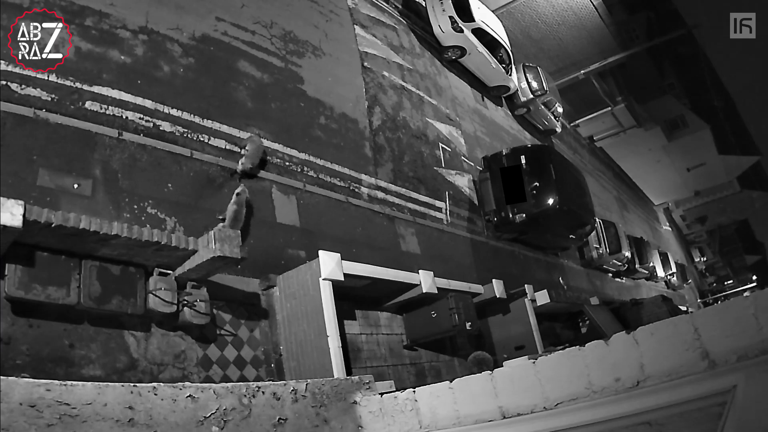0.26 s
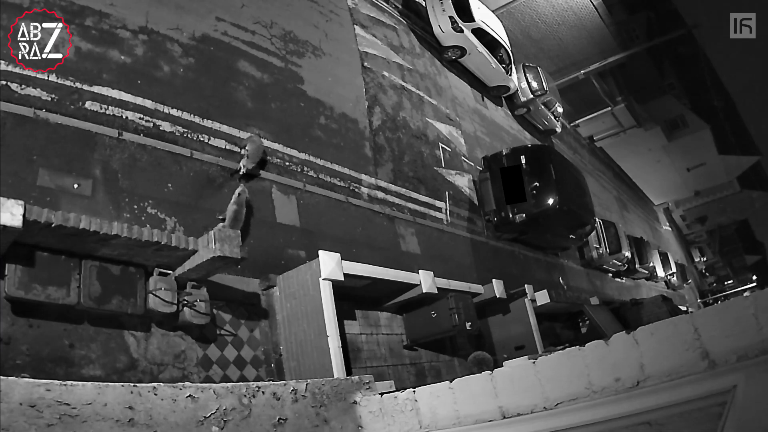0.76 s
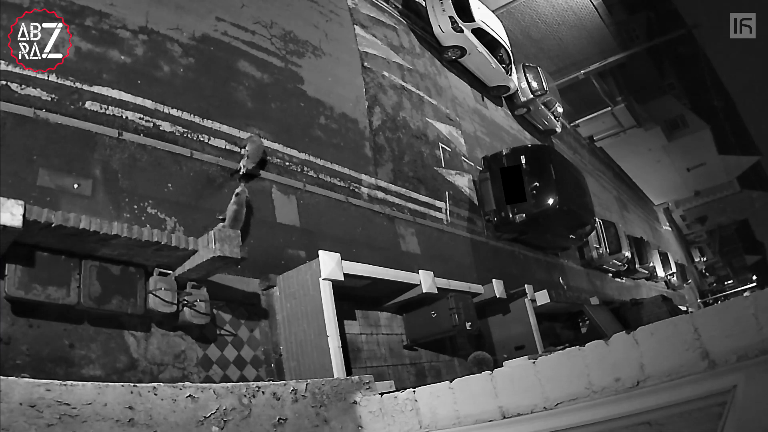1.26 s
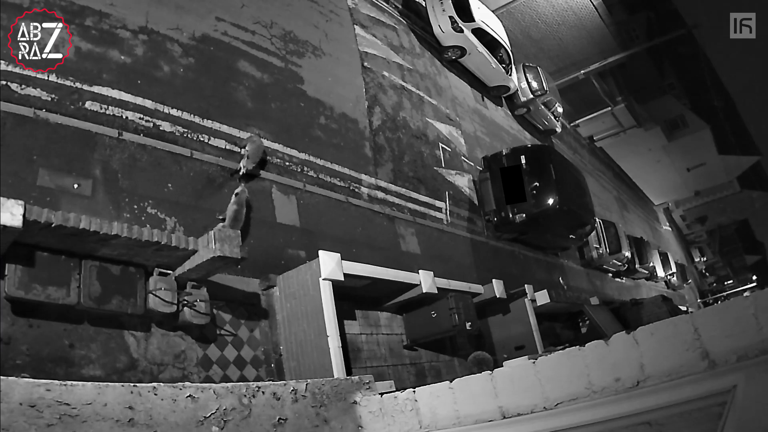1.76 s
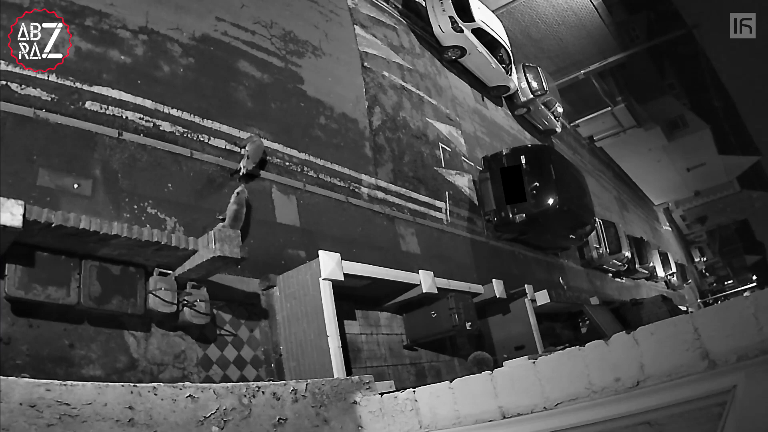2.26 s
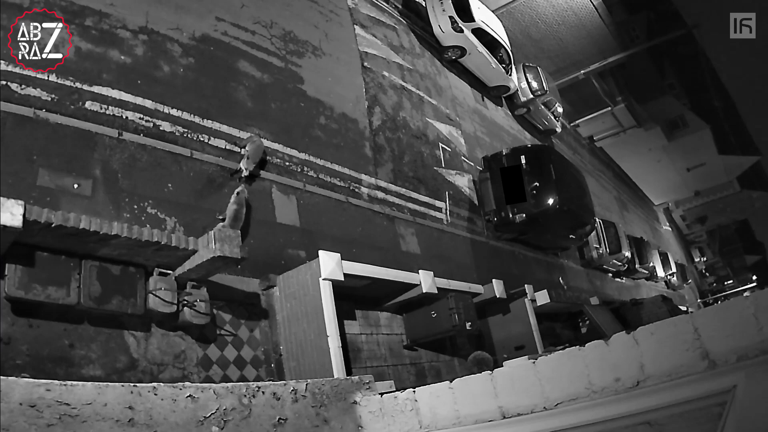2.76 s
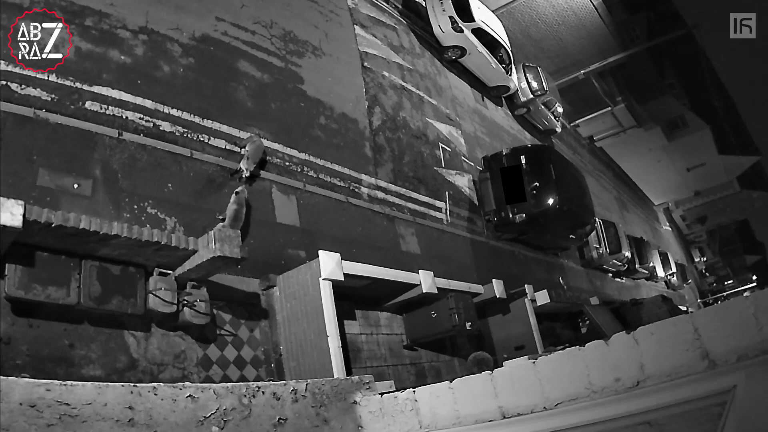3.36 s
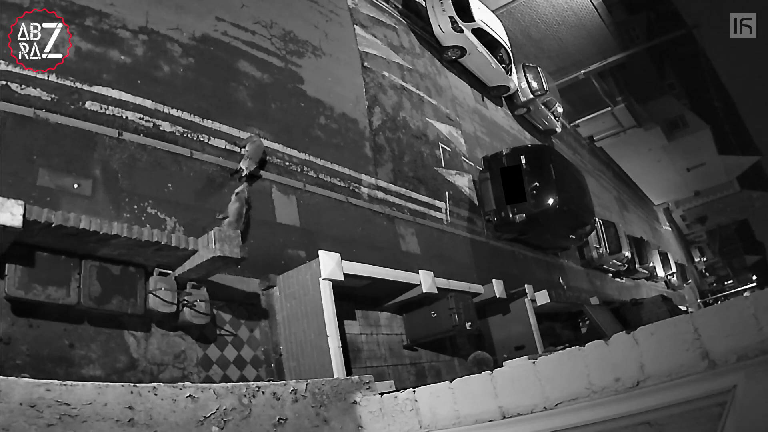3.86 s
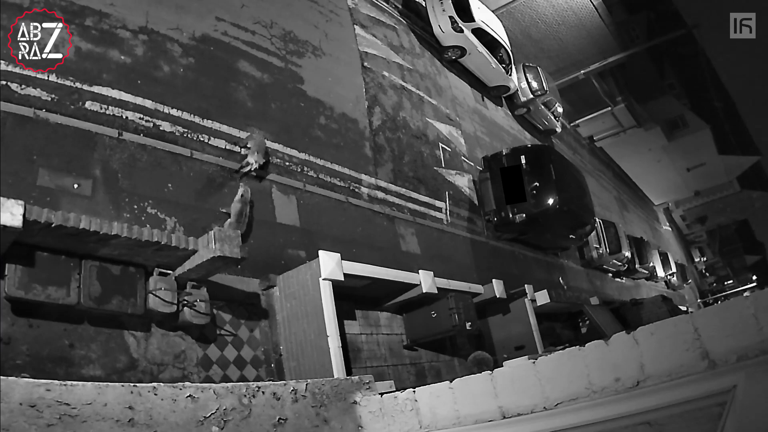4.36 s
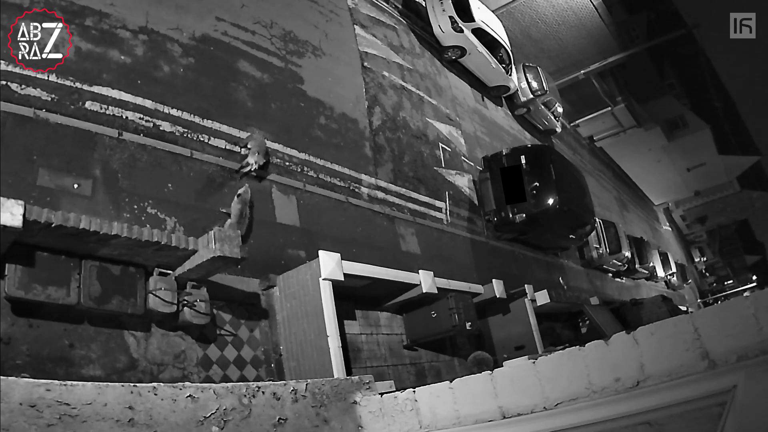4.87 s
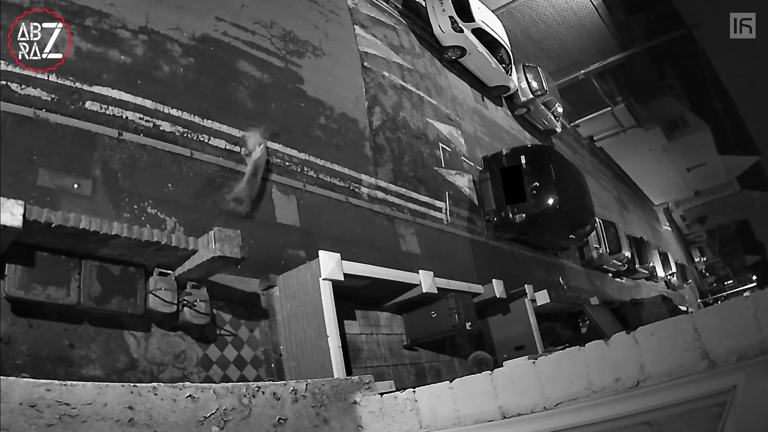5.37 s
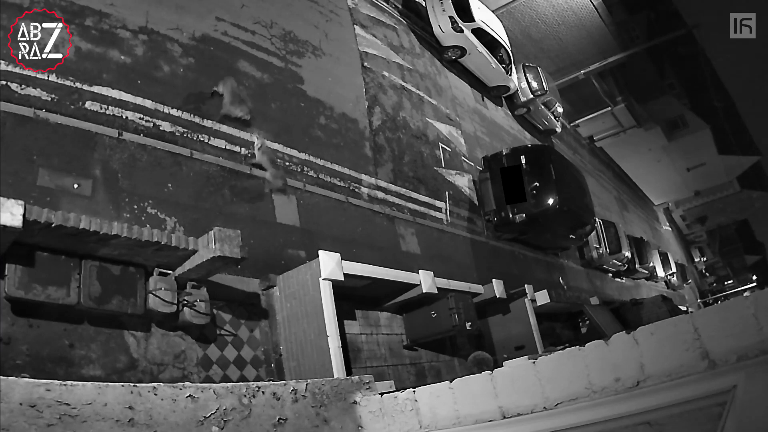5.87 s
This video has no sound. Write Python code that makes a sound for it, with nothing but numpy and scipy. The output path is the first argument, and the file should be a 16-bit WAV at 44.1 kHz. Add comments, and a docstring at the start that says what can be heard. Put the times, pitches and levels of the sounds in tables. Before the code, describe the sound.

Two foxes quarrel in a quiet street at night. From the start, one gives short, high, arching squeals and whines, chopped by a fast throat flutter and ranging from clean to raspy, with loud ones at about 0.5 and 1.6 seconds. The other answers with brief hoarse screeches, each opening on a tiny rising yip and falling at the end. Its longest screech runs from about 1.5 to 2 seconds, and another drawn-out one comes near 3.4 seconds. The two keep trading and overlapping calls roughly every half second. From about 5 seconds the chatter gets denser and harsher, and the second fox switches to three short snarls at about 5.6, 5.8 and 6.1 seconds, alternating with loud squeals. Every cry echoes briefly off the house fronts. A small microphone adds faint steady hiss and low hum, with a slight overload crackle on the loudest cries.

```python
"""Night street, below a house front: two foxes quarrel over food.
One chatters: whines and arching squeals chopped by a fast throat flutter, from clean to harsh.
The other answers with hoarse screeches, then snarls: chaotic fold pulses and air, with ringing peaks.
House fronts echo over faint hiss; a small microphone hums, colours the cries and overloads."""
import sys
import numpy as np
from scipy import signal
from scipy.fft import rfft, irfft
from scipy.io import wavfile
from scipy.ndimage import map_coordinates

SR = 44100
rng = np.random.default_rng(int(sys.argv[2]) if len(sys.argv) > 2 else 0)


def wrap_up_sound(samples):
    """Save the sound to the file named by the first command line argument, as 16-bit audio."""
    columns = np.atleast_2d(samples).T
    # keep every value between -1 and 1, then stretch to whole-number steps
    tamed = np.clip(columns, -1, 1)
    steps = np.round(tamed * 32767).astype(np.int16)
    wavfile.write(sys.argv[1], SR, steps)


N = 269892
T = np.arange(N) / SR
TOP_HZ = 15900
# hoarse calls: start_s, length_s, pitch_hz, last_pitch_hz, level_db
SCREECH_CALLS = [ (0.315, 0.11, 1010, 771, -27), (0.787, 0.11, 998, 752, -30.5),
                 (1.462, .535, 991.2, 757, -25.5), (2.322, 0.18, 997, 899.5, -25.5),
                 (2.502, 0.074, 853, 713.6, -43.5), (2.878, 0.12, 1008, 793, -25.5),
                 (3.358, 0.32, 980, 756, -28.5), (3.953, .115, 1018, 798.7, -27.5),
                 (4.297, 0.12, 1038, 906, -27), (4.738, .1, 980, 930, -27.5), (5.077, 0.12, 1010, 929, -26)]


def undb(db):
    """Decibels to gain."""
    return 10 ** (np.asarray(db) / 20)


def unit(x):
    """Scale to rms 1."""
    return x / np.sqrt(np.mean(x ** 2))


def gain_at(hz, spectrum):
    """Spectrum gain, interpolated in log frequency."""
    points_hz, db = np.transpose(spectrum)
    return undb(np.interp(np.log(hz + 1), np.log(points_hz), db))


def colour(x, spectrum, resonances=()):
    """Filter by a broad spectrum plus resonant humps; rms 1."""
    f = np.arange(N // 2 + 1) * SR / N
    humps_db = sum(db / (1 + (2 * (f - hz) / width_hz) ** 2) for hz, width_hz, db in resonances)
    return unit(irfft(rfft(x) * gain_at(f, spectrum) * undb(humps_db), N))


def wander(hz):
    """Random motion, rms 1, rolled off above hz."""
    f = np.arange(N // 2 + 1) * SR / N
    return unit(irfft(rfft(rng.standard_normal(N)) * np.exp(-(f / hz) ** 2), N))


def perform(calls, edge_s):
    """Join calls into a gate and full-length control curves."""
    gate, curves = np.zeros(N), np.tile(calls[0][1:, :1], N)
    for time_s, *controls in sorted(calls, key=lambda call: call[0, 0]):
        span = slice(*np.searchsorted(T, [time_s[0] - edge_s, time_s[-1] + edge_s]))
        outside_s = np.maximum(time_s[0] - T[span], T[span] - time_s[-1])
        gate[span] = np.maximum(gate[span], np.clip(2 - 2 * outside_s / edge_s, 0, 1))
        curves[:, span] = [np.interp(T[span], time_s, control) for control in controls]
    return [gate, *curves]


def folds(hz, spectrum, count):
    """Vocal fold harmonics, one per row, total power 1; the throat scatters their phases."""
    phase = 2 * np.pi * np.cumsum(hz) / SR
    k = np.arange(1, count + 1)[:, None]
    size = gain_at(k * hz, spectrum) * (k * hz < TOP_HZ)
    lag = rng.uniform(0, 2 * np.pi, (count, 1))
    return np.sqrt(2) * np.sin(k * phase + lag) * size / np.sqrt(np.sum(size ** 2, axis=0))


def night(air_db=-72):
    """Faint air hiss and wavering microphone hum."""
    # hum lines: freq_hz, level_db
    hum_lines = [(150.7, -85), (253.0, -76.5), (452.2, -87), (554.5, -85.5)]
    # night air: freq_hz, gain_db
    air_spectrum = [(18, -96), (30, -22), (133, -41), (202, -15.5), (263, -31), (389, -5.5), (443, -14.5),
                    (808, -9.5), (1550, -7), (4190, -14), (15500, -26.5)]
    hum = sum(np.sqrt(2) * undb(db + wander(5)) * np.sin(2 * np.pi * hz * T) for hz, db in hum_lines)
    return hum + undb(air_db) * colour(rng.standard_normal(N), air_spectrum)


def whine(start_s, length_s, first_hz, last_hz, first_rate_hz, last_rate_hz, first_db, last_db, harsh):
    """Control curves of a glide that levels off."""
    share = np.linspace(0, 1, 20)
    glide = 1 - (1 - share) ** 2
    pitch_hz = first_hz + (last_hz - first_hz) * glide
    flutter_hz = first_rate_hz + (last_rate_hz - first_rate_hz) * glide
    level_db = first_db + (last_db - first_db) * share
    harshness = np.full_like(share, harsh)
    return np.array([start_s + length_s * share, pitch_hz, flutter_hz, level_db, harshness])


def squeal(start_s, length_s, top_hz, first_rate_hz, last_rate_hz, swell_s, db, harsh):
    """Control curves of one arch of effort: scoop to a crest, then pitch and level sink."""
    scoop, crest_share, end_hz = .07, .22, 840
    swell_db, fade_db = 10.5, 23.5
    break_hz, break_width_hz, break_db, break_harsh = 1194, 123, 3.5, .28
    age_s = np.linspace(0, length_s, 40)
    share = age_s / length_s
    rise = np.clip(1 - share / crest_share, 0, 1) ** 2
    sink = np.clip((share - crest_share) / (1 - crest_share), 0, 1) ** 2.1
    pitch_hz = top_hz * (1 - scoop * rise) + (end_hz - top_hz) * sink
    # flutter mostly slows as breath runs out
    flutter_hz = np.interp(age_s, [.0244, .0914], [first_rate_hz, last_rate_hz])
    # the voice breaks on the way down: a harsh catch, then a cleaner whimper
    catch = np.exp(-((pitch_hz - break_hz) / break_width_hz) ** 2) * (sink > 0)
    onset = np.clip(1 - age_s / swell_s, 0, 1)
    level_db = db - swell_db * onset - fade_db * sink ** 1.2 + break_db * catch
    harshness = harsh * np.interp(pitch_hz, [end_hz, break_hz], [.5, 1]) + break_harsh * catch
    return np.array([start_s + age_s, pitch_hz, flutter_hz, level_db, harshness])


def throat_puffs(calls, flutter_hz, width_cycles=.18, blur_hz=150):
    """Throat opening, 0-1; each call starts on a puff, and fast flutter merges the puffs."""
    cycles = np.zeros(N)
    for time_s, _, rate_hz, *_ in sorted(calls, key=lambda call: call[0, 0]):
        span = slice(*np.searchsorted(T, [time_s[0] - .5 / rate_hz[0], time_s[-1] + 1 / rate_hz[-1]]))
        cycles[span] = np.cumsum(np.interp(T[span], time_s, rate_hz)) / SR - .5
    in_cycle = (cycles + .5) % 1 - .5
    puff = np.exp(-.5 * np.abs(in_cycle / width_cycles) ** 3)
    merged = np.clip((flutter_hz / blur_hz) ** 6, 0, 1)
    return (1 - merged) * puff + merged / 2


def chatter(leak=.12, bend=.025, jitter=.03932, ragged_db=3, whistle_hz=12850, whistle_db=-13):
    """First fox: a high voice let out in puffs; force breaks it into rasp."""
    # arches: start_s, length_s, top_hz, first_flutter_hz, last_flutter_hz, swell_s, level_db, harshness
    squeals = [ (0.132, 0.11, 1745, 78, 49, 0.021, -29.5, 0.34),
               (0.509, 0.097, 2020, 72, 37.3, 0.015, -19.5, 0.6),
               (1.086, 0.12, 1421, 72.7, 52.1, 0.036, -35.5, 0.38),
               (1.312, 0.11, 1408, 77.6, 54.77, 0.034, -32, 0.54),
               (1.632, 0.13, 1734, 89.9, 72.7, 0.064, -20, 0.53),
               (2.128, 0.12, 1692, 107.5, 65.5, 0.013, -29.5, 0.32),
               (2.999, .12, 1865, 91.54, 53, 0.046, -22.5, 0.63),
               (3.692, .13, 1860, 86.8, 67, 0.055, -23.5, 0.45),
               (3.949, 0.12, 1950, 99.3, 61.5, .022, -27, 0.63),
               (4.293, .112, 2064, 71.04, 44.5, 0.027, -23, 0.81),
               (4.722, .13, 1700, 70.13, 62.68, .012, -28.5, 0.46),
               (4.963, 0.063, 1180, 148, 152, 0.025, -35, 0.4),
               (5.072, .08, 2020, 92.6, 87.2, 0.019, -33, 0.73),
               (5.296, 0.12, 1817, 87.4, 54.97, 0.024, -24.5, .52),
               (5.519, 0.12, 2150, 73.66, 71, 0.024, -18, 0.68),
               (5.747, .095, 2000, 95.5, 93.3, 0.034, -19.5, 0.76),
               (6.004, 0.096, 2100, 70.5, 45.3, .008, -26, 0.74)]
    # glides: start_s, length_s, first_hz, last_hz, first_flutter_hz, last_flutter_hz,
    # first_db, last_db, harshness
    whines = [ (0, 0.019, 1520, 1417, 69, 66, -49, -53, 0.47),
              (1.195, 0.044, 980, 890, 139.3, 141.8, -42, -53, 0.04),
              (1.252, .04, 930, 1130, 139.9, 138, -40, -62, 0.22),
              (1.443, 0.029, 1400, 1678, 147.2, 140.8, -47, -30.5, 0.17),
              (3.18, .166, 1080, 1630, 56.6, 80.3, -39.5, -25.5, 0.49),
              (4.864, .03, 795, 752, 56, 55.5, -45.5, -47, 0.57),
              (4.924, 0.032, 896, 1120, 150.2, 152.6, -50, -45, 0.55),
              (5.423, 0.072, 1180, 1430, 54, 66.53, -44, -36.5, 0.4)]
    # fold harmonics: freq_hz, gain_db
    tone_spectrum = [(700, 46), (1200, -4.5), (1650, -2), (2100, -11), (2700, -8.5), (3350, 2.5),
                     (4200, -2), (5100, -3), (6500, -20)]
    # rasp noise: freq_hz, gain_db
    rasp_spectrum = [(200, -28), (800, -18.5), (1600, -11), (2600, -12), (3400, -10), (4300, 0.5),
                     (5400, -2), (6300, -14.5), (7000, -12), (8000, -24), (9500, -13.5), (12000, -4.5),
                     (13500, -33), (16000, -18)]
    # ringing peaks of the rasp: freq_hz, width_hz, gain_db
    peaks = [(4524, 110, 3.5), (13150, 390, 21)]
    calls = [squeal(*row) for row in squeals] + [whine(*row) for row in whines]
    gate, hz, flutter_hz, db, harsh = perform(calls, edge_s=.0059)
    harsh = np.clip(harsh, .03, .97)
    puff = throat_puffs(calls, flutter_hz)
    # pitch rises with puff pressure
    hz = hz * (1 + bend * (puff - 1) + .012 * wander(60) + jitter * harsh * wander(855))
    partials = [partial * undb(ragged_db * wander(140)) for partial in folds(hz, tone_spectrum, count=5)]
    # the fundamental carries on between puffs; overtones nearly stop
    tone = partials[0] * (.44 + .17 * puff) + sum(partials[1:]) * (leak + puff)
    whistle = np.sin(2 * np.pi * np.cumsum(whistle_hz * (1 + .016 * wander(120))) / SR)
    high_pitched = np.interp(hz, [1450, 1650], [0, 1])
    tone += undb(whistle_db) * whistle * puff * high_pitched
    rasp = colour(rng.standard_normal(N), rasp_spectrum, peaks) * (leak + puff)
    voice = ((1 - harsh) * tone + harsh * rasp) / np.hypot(1 - harsh, harsh)
    return 1.477 * voice * gate * undb(db + wander(68))


def yips(start_hz=1400, top_hz=1720, lead_s=.004, length_s=.034, gain_db=-12, scoop_db=15):
    """A short rising whistle opens each screech, before the folds turn chaotic."""
    offsets_s = length_s * np.array([0, .5, 1]) - lead_s
    calls = [np.array([start_s + offsets_s, [start_hz, top_hz, top_hz], [db - scoop_db, db, db]])
             for start_s, *_, db in SCREECH_CALLS]
    gate, hz, db = perform(calls, edge_s=.01)
    partials = folds(hz * (1 + .012 * wander(500)), [(1600, -1.5), (3300, -12.5), (4900, -5)], count=3)
    return partials.sum(axis=0) * gate * undb(gain_db + db)


def cry(start_s, length_s, hz, last_hz, db):
    """Control curves of a screech or snarl: pitch and level sag between surges."""
    attack_s, attack_db, release_s, release_db = .026, 10, .045, 9
    first_surge_s, surge_period_s, lull_db, lull_sag = .05, .21, 5.5, .07
    age_s = np.linspace(0, length_s, 80)
    attack = np.clip(1 - age_s / attack_s, 0, 1)
    release = np.clip(1 - (length_s - age_s) / release_s, 0, 1)
    lull = np.sin(np.pi * (age_s - first_surge_s) / surge_period_s) ** 2
    held_hz = hz * (1 - lull_sag * lull * (age_s > first_surge_s))
    pitch_hz = held_hz + (last_hz - held_hz) * release ** 2
    level_db = db - attack_db * attack - lull_db * lull - release_db * release
    return np.array([start_s + age_s, pitch_hz, level_db])


def hoarse_voice(calls, peaks, jitter, air_db, tone_db, settle_s, rough_db=3, tone_delay_s=.035):
    """Second fox: chaotic fold pulses and air with ringing peaks, over a thin wavering fundamental."""
    # hoarse timbre: freq_hz, gain_db
    spectrum = [(100, -29), (700, -28.5), (1250, -18), (2300, -12), (3000, -6.5), (3600, -14.5),
                (4600, -6.5), (5700, -11.5), (6900, -19), (8000, -28.5), (9500, -20), (11500, -20),
                (13000, -19), (16000, -26.5)]
    gate, hz, db = perform([cry(*row) for row in calls], edge_s=.014)
    # chaos settles into a buzz as the call is held
    age_s = T - np.maximum.accumulate(np.where(gate > 0, 0, T))
    chaos = np.exp(-age_s / settle_s)
    # fold motion repeats every third cycle: subharmonics
    pulse_hz = hz / 3 * (1 + jitter * chaos * wander(400))
    pulses = folds(pulse_hz, [(500, -32.5), (1000, -8), (2000, -22)], count=40).sum(axis=0)
    air = undb(air_db) * np.sqrt(chaos) * rng.standard_normal(N)
    rasp = colour((pulses + air) * undb(rough_db * chaos * wander(240)), spectrum, peaks)
    # all peaks tremble together in frequency
    warp = np.cumsum(1 + .007 * wander(14))
    rasp = map_coordinates(rasp, [warp], order=5, mode="mirror")
    tone_phase = 2 * np.pi * np.cumsum(hz * (1 + .028 * wander(150))) / SR
    tone = np.sin(tone_phase) * undb(4 * wander(45))
    # the fundamental enters late, after the rasp has begun, and stops with it
    late_gate = np.interp(T - tone_delay_s, T, gate)
    return gate * (rasp * undb(db) + late_gate * tone * undb(tone_db + .63 * db))


def screeches():
    """Hoarse cries with strong fold jitter, falling at the end."""
    # ringing peaks, voice and microphone colour together: freq_hz, width_hz, gain_db
    peaks = [(1564, 200, 10.5), (4170, 273, 14), (4955, 430, 7), (11080, 470, 10.5), (11930, 2100, 7.5)]
    return hoarse_voice(SCREECH_CALLS, peaks, jitter=.07, air_db=5.5, tone_db=-25, settle_s=.3956)


def snarls():
    """Three short hoarse cries: steadier folds, weaker fundamental."""
    # snarls: start_s, length_s, pitch_hz, last_pitch_hz, level_db
    calls = [ (5.58, .082, 1020, 900, -24), (5.805, .105, 1048, 999, -24), (6.075, 0.11, 1127, 1130, -20.5)]
    # ringing peaks, voice and microphone colour together: freq_hz, width_hz, gain_db
    peaks = [(1586, 232, 12.9), (2768, 140, 10.3), (3186, 147, 10.8), (4042, 290, 8.6), (4290, 180, 12.4),
             (11800, 990, 14)]
    return hoarse_voice(calls, peaks, jitter=.025, air_db=6, tone_db=-36, settle_s=.34)


def street(x, build_s=.0021):
    """Direct sound, distinct echoes and a diffuse tail decaying per band."""
    # echoes off kerb, walls and cars: delay_s, gain_db, cutoff_hz
    echoes = [(.0065, -19.5, 11900), (0.021, -16, 11930), (.058, -18.5, 2000), (.108, -30, 1960)]
    # diffuse tail: freq_hz, gain_db, t60_s
    tail_bands = [(282, -10, 0.85), (922, -42.5, 0.22), (1440, 1, 0.34), (2770, -12, 0.45),
                  (4480, -16, 0.51), (7400, -2.5, 0.35), (11800, -12.5, 0.43)]
    t, f = T[:SR], np.arange(SR // 2 + 1)
    centres_hz = np.transpose(tail_bands)[0]
    noise = rfft(rng.standard_normal(SR))
    response = np.zeros(SR)
    for weights, (_, db, t60_s) in zip(np.eye(len(tail_bands)), tail_bands):
        band = irfft(noise * np.interp(f, centres_hz, weights), SR)
        fade = np.exp(-np.log(1000) * t / t60_s) * (1 - np.exp(-t / build_s))
        response += band * undb(db) * fade / np.sqrt(np.sum(fade ** 2))
    for delay_s, db, cutoff_hz in echoes:
        click = signal.unit_impulse(SR, int(delay_s * SR))
        response += undb(db) * signal.lfilter(*signal.butter(4, cutoff_hz, fs=SR), click)
    return x + signal.fftconvolve(x, response)[:N]


def scene():
    """Both foxes in the street, over hiss and hum; mono."""
    voices = screeches() + snarls() + chatter() + yips()
    return (street(voices) + night())[None]


def record(dry, lopsided=.83, crackle_hz=(260, 750)):
    """Uneven microphone overload adds low crackle to the loudest puffs; the top is cut."""
    squashed = np.tanh(signal.resample_poly(dry, 2, 1, axis=1))
    crackle_band = signal.butter(2, crackle_hz, "band", fs=2 * SR, output="sos")
    crackle = signal.sosfilt(crackle_band, squashed ** 2)
    overloaded = signal.resample_poly(squashed + lopsided * crackle, 1, 2, axis=1)
    return signal.sosfilt(signal.ellip(10, .2, 70, TOP_HZ, fs=SR, output="sos"), overloaded)


dry = scene()
out = record(dry)
wrap_up_sound(out)
```